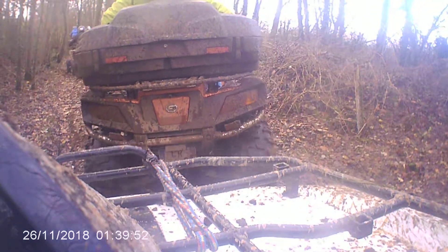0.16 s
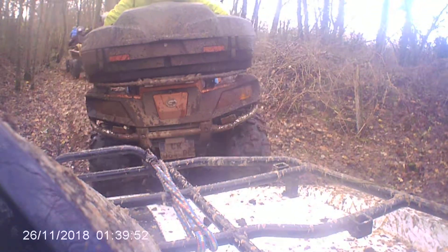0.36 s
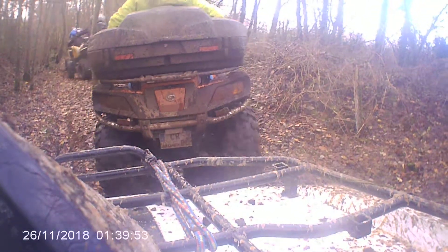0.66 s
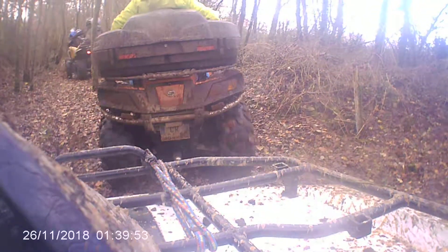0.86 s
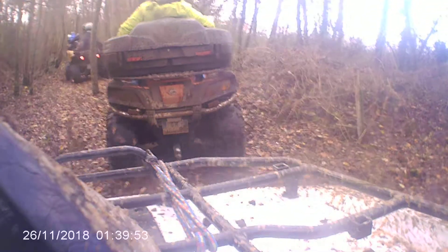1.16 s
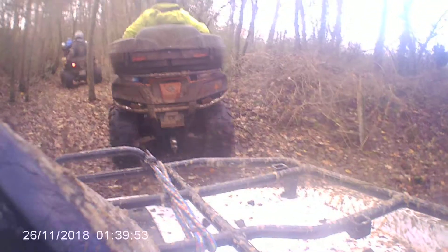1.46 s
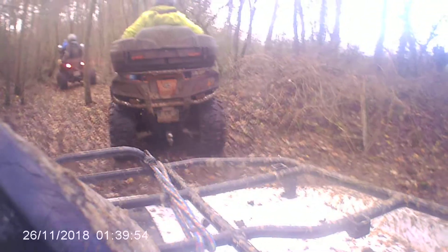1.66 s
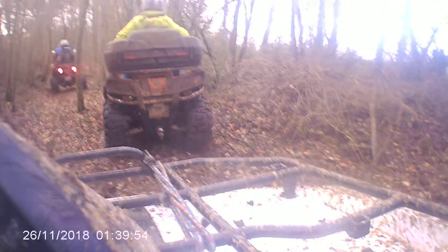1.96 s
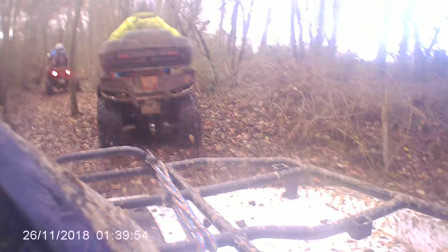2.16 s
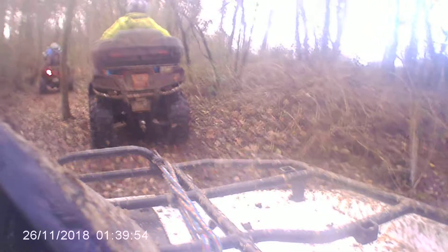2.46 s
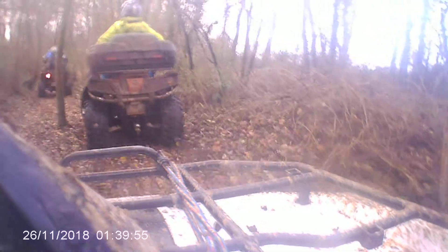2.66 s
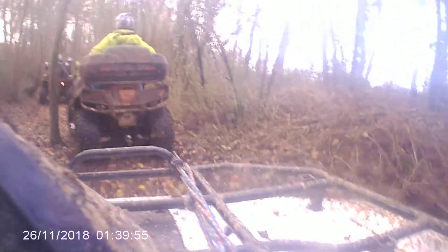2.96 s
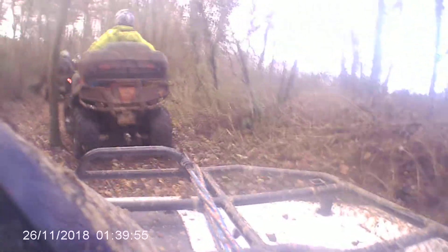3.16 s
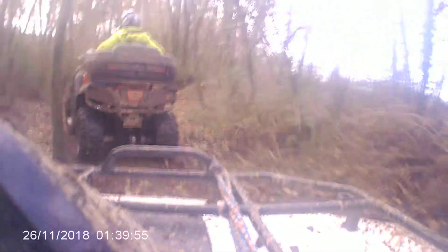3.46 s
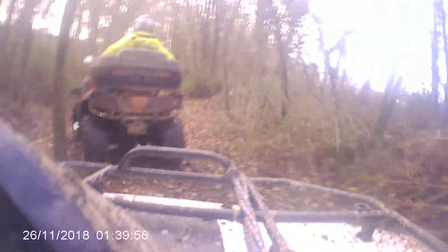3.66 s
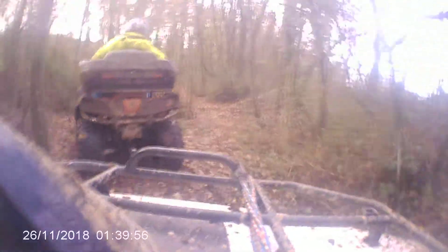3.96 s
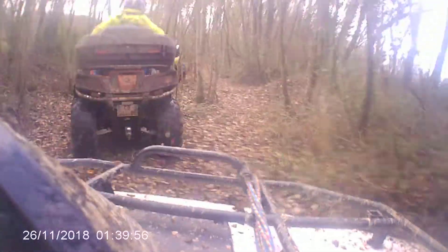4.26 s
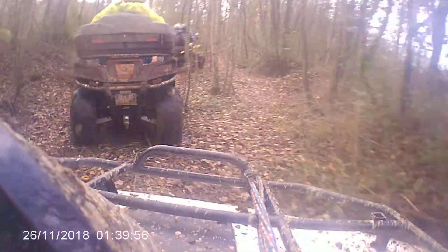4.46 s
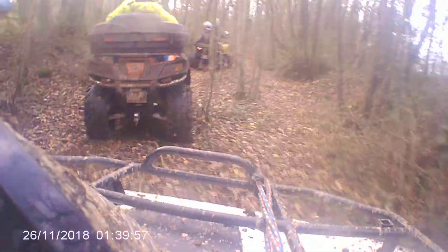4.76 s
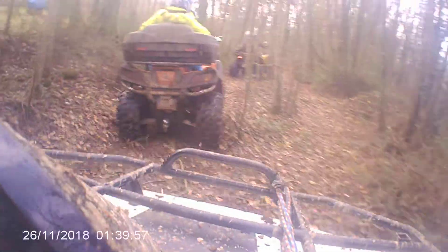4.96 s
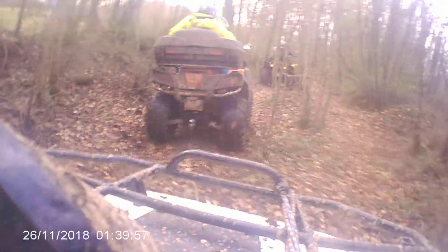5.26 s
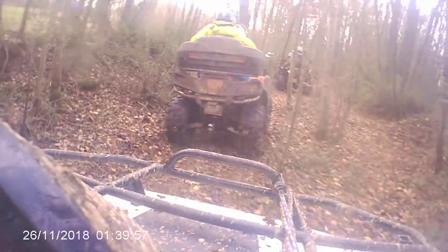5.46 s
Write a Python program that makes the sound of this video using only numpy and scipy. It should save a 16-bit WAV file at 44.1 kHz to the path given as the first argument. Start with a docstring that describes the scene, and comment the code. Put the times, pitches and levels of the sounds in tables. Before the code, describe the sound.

A fast, harsh plastic rattle opens over the low drone of a slow quad bike, shaking the mounted microphone into brief distortion. The rattle drops away, leaving engine throb, tyre rumble and dull ticks of twigs on the trail. It returns with another overload, then gives way to a quieter stretch. A few sharp knocks and one short final rattle follow, while the engine keeps running with small changes in speed.

```python
"""A quad bike crawls along a woodland trail behind another, heard from an action camera mounted on it.
From the start the engine shakes the camera about 40 times a second, over muffled clatter, tyre rumble
and a slower throb; something loose, likely the camera case, knocks twice per crank turn in spells.
Near 1 s the shaking overloads the microphone, then a lull lets dull ticks through. The rattle returns
after 2 s, with more overload near 3 s. After another lull come knocks and a last rattle before 5 s."""
import sys
import numpy as np
from scipy import signal
from scipy.fft import rfft, irfft, next_fast_len
from scipy.io import wavfile
from scipy.ndimage import uniform_filter1d

SR = 44100
rng = np.random.default_rng(int(sys.argv[2]) if len(sys.argv) > 2 else 0)


def transcribe(signal):
    """Save signal, clipped to [-1, 1], as a 16-bit WAV file at the path in sys.argv[1]."""
    frames = np.atleast_2d(signal).T
    limited = np.clip(frames, -1, 1)
    pcm = np.round(limited * 32767).astype(np.int16)
    wavfile.write(sys.argv[1], SR, pcm)


N = 247401
TIME = np.arange(N) / SR


def amp(db):
    """Turn decibels into a gain to multiply by."""
    return 10 ** (np.asarray(db) / 20)


def unit(x):
    """Scale a signal to an average (rms) level of 1."""
    return x / np.sqrt(np.mean(x ** 2) + 1e-20)


def curve(rows):
    """Join (seconds, value) rows with straight lines."""
    return np.interp(TIME, *np.transpose(rows))


def filtered(x, response):
    """Filter a sound; response(hz) says how each frequency is scaled and delayed."""
    size = next_fast_len(len(x) + SR // 2)
    return irfft(rfft(x, size) * response(np.fft.rfftfreq(size, 1 / SR)), size)[:len(x)]


def coloured(x, points):
    """Shape a sound's tone with (Hz, dB) points, then set its level to 1."""
    freqs, db = np.transpose(points)
    return unit(filtered(x, lambda hz: amp(np.interp(np.log(hz + 1), np.log(freqs), db))))


def add(track, s, sound):
    """Mix a short sound into a track, s seconds in."""
    start = int(np.clip(round(s * SR), 0, N - 1))
    track[start:start + len(sound)] += sound[:N - start]


def patchy_noise(patchy_db):
    """White noise with drifting louder and softer patches."""
    spectra = signal.stft(rng.standard_normal(N), nperseg=512)[2]
    patches = uniform_filter1d(rng.standard_normal(spectra.shape), size=4, axis=0)  # smooth over pitch
    patches = uniform_filter1d(patches, size=12, axis=1)  # and over time
    return signal.istft(spectra * amp(patchy_db * unit(patches)), nperseg=512)[1][:N]


# The tone of the tyre rumble. Each row: frequency in Hz, relative level in dB.
RUMBLE_TONE = [(10, -11.5), (20, -6.5), (28, -4), (45, -16), (70, -16), (110, -26.5), (170, -32.5),
               (300, -40), (700, -63), (2000, -120)]

def tyre_rumble(level_db=-29):
    """Tyres and chassis rumble over rough ground."""
    return amp(level_db) * coloured(rng.standard_normal(N), RUMBLE_TONE)


# The clearest ticks. Each row: time in seconds, peak in dB before boost_db is added, pitch in Hz.
CLEAR_TICKS = [(1.5302, -36.5, 1278), (1.7989, -32, 1286), (1.9405, -31.5, 1720), (1.9762, -30.5, 1700),
               (4.9942, -35.5, 1590), (5.3882, -34.5, 1010)]

def twig_ticks(boost_db=3, faint_per_s=4, faint_db=-36, faint_hz=1416, fade_s=0.023, sharpness=4):
    """Small things, likely twigs and stones, tick dully under the wheels; faint ones come at random."""
    clear = [(s, db + boost_db, hz) for s, db, hz in CLEAR_TICKS]
    faint = [(rng.uniform(0, N / SR), faint_db + 2 * rng.normal(), faint_hz * 2 ** (.3 * rng.normal()))
             for _ in range(int(faint_per_s * N / SR))]
    t = np.arange(SR // 16) / SR
    track = np.zeros(N)
    for s, db, hz in clear + faint:
        burst = rng.standard_normal(len(t)) * amp(-60 * t / fade_s)
        # keep the part of the burst near the tick's pitch
        snap = filtered(burst, lambda f: 1 / (1 + 1j * sharpness * (f / hz - hz / (f + 1))) ** 2)
        add(track, s, amp(db) * snap / np.abs(snap).max())
    return track


# The tone of the clatter inside the case. Each row: frequency in Hz, relative level in dB.
CLATTER_TONE = [(120, -6.5), (230, -1.5), (300, 5), (370, -11), (463, 7.5), (550, -16), (690, -2.5),
                (920, -13.5), (1200, -3.5), (1430, -13), (1720, -12), (2000, -25), (2600, -32), (3900, -30),
                (5000, -40.5), (5650, -34.5), (7000, -48), (16000, -57.5)]

def engine_clatter(turns, level_db=-36, db_per_shake_db=0.57, throb_db=3.5):
    """Valve and exhaust noise swells once per crank turn and grows with the shaking."""
    throb = amp(throb_db * np.cos(2 * np.pi * turns))
    gain = amp(level_db + db_per_shake_db * curve(SHAKE_LEVEL))
    return gain * coloured(throb * patchy_noise(patchy_db=3.06), CLATTER_TONE)


# The pitch of the slower throb. Each row: time in seconds, pitch in Hz.
AHEAD_PITCH = [(0, 21.35), (.9, 24.1), (1.3, 30.14), (2.2, 31), (3.4, 27.23), (4.4, 25.33), (5.6, 28.8)]

def quad_ahead(level_db=-23):
    """A low throb, likely the engine of the quad ahead, beats against the shaking."""
    return amp(level_db) * np.sin(2 * np.pi * np.cumsum(curve(AHEAD_PITCH)) / SR)


# The tone of the dull rocking. Each row: frequency in Hz, relative level in dB.
ROCKING_TONE = [(10, 3), (22, 2), (32, -6.5), (65, 5), (100, -4), (140, -13), (220, -19), (400, -40),
                (1500, -100)]

def camera_rocking(level_db=-20.5):
    """The camera rocks on its mount in step with the strength of the rattle."""
    strength = sum(amp(spell_db(spell, TIME)) * (TIME > spell[0]) * (TIME < spell[1])
                   for spell in RATTLE_SPELLS)
    smoothed = np.abs(uniform_filter1d(strength, size=4000))
    swell = np.sqrt(smoothed * strength.max())
    return amp(level_db) * swell * coloured(rng.standard_normal(N), ROCKING_TONE)


def spell_db(spell, at, sag_db=3.5, attack_db=3, attack_s=0.0028):
    """A rattling spell's level: a quick rise, then steady growth or fading, sagging at both ends."""
    start, end, db, growth_db = spell
    since = np.clip(at - start, 0, end - start)
    place = since / (end - start) - .5  # -0.5 at the start, 0.5 at the end
    arch_db = sag_db * (.5 - (2 * place) ** 2)
    return db + growth_db * place + arch_db - attack_db * np.exp(-since / attack_s)


def knock(db, chatter, chatter_s=0.0042, soft_hz=4500):
    """One knock: a hit, a quick rebound and a dying chatter; harder knocks are briefer, so brighter."""
    t = np.arange(SR // 40) / SR
    skitter = rng.standard_normal(len(t)) * np.exp(-t / chatter_s)
    force = chatter * amp(2 * rng.normal()) * skitter / np.linalg.norm(skitter)
    force[0] += 1  # the hit
    force[int(rng.uniform(.0002, .0009) * SR)] -= rng.random()  # the rebound
    cutoff_hz = soft_hz * amp(db)
    pole = np.exp(-2 * np.pi * cutoff_hz / SR)
    softened = signal.lfilter([1 - pole], [1, -pole], force / np.linalg.norm(force))
    return amp(db) * np.hypot(1, 2000 / cutoff_hz) * softened  # hold the level where the case rings most


# The notes the case rings at. Each row: pitch in Hz, width in Hz, relative level in dB.
CASE_NOTES = [(97.7, 150, -14), (432, 210, -8.5), (558, 92, -0.5), (804, 535, -5.5), (1188, 106.5, 2.5),
              (1560, 211, 0), (2203, 310, 1), (2598, 402, -2.5), (3183, 383, -2.5), (4130, 1160, -11.5),
              (4740, 765, -11.5), (5495, 540, -20.5), (7970, 490, -24), (9230, 430, -29.5),
              (13360, 700, -27.5), (13600, 1900, -32)]

def case_ring(force):
    """The plastic case rings briefly at its own notes whenever it is struck."""
    def response(hz):
        return sum((-1) ** k * amp(db) * 1j * hz * width / (pitch ** 2 - hz ** 2 + 1j * hz * width)
                   for k, (pitch, width, db) in enumerate(CASE_NOTES))
    power = np.mean(np.abs(response(np.fft.rfftfreq(SR // 4, 1 / SR))) ** 2)
    return filtered(force, response) / np.sqrt(power)


# Spells of rattling. Each row: start and end in seconds, relative level in dB, growth across it in dB.
RATTLE_SPELLS = [(.014, 0.237, -7, -2), (.303, .40, -8.5, 1.5), (.456, 1.023, -1.47, 3.5),
                 (1.025, 1.067, -6, -5), (1.076, 1.187, -10, -2), (2.116, 2.40, -6, -0.5),
                 (2.5875, 2.65, -8, -2), (2.662, 3.28, -4.5, -3.5), (3.303, 3.40, -9.5, -4),
                 (4.582, 4.857, -15.5, 5.5)]
# Distinct knocks, alone or standing out in a rattle. Each row: time in seconds, relative level in dB.
CASE_KNOCKS = [(0.002, -2.5), (0.237, -11.5), (0.253, 1), (0.292, -9), (0.41, -4), (0.434, -2.5),
               (0.442, -7.5), (1.251, -12.5), (1.263, -9), (1.276, -11), (1.286, -4.5), (1.591, -9.5),
               (1.601, -13.5), (1.63, -18), (1.699, -19), (2.414, -8), (2.422, -3.5), (2.474, -10),
               (2.494, -11.5), (2.506, -11.5), (2.549, -13.5), (2.568, -5), (3.262, -5), (3.718, -22.5),
               (4.363, -21), (4.39, -12.5), (4.398, -12), (4.42, -7.5), (4.431, -11), (4.439, -10),
               (4.447, -5), (4.499, -14.5), (4.643, -4.5), (4.691, -4.5), (4.744, -5), (4.815, -4.5),
               (4.841, -9)]

def case_rattle(turns, boost_db=13, uneven_db=1.65, scatter_db=1.3, jitter_s=.00025):
    """In a spell the case slams one stop and skitters on the other each turn; distinct knocks join in."""
    force = np.zeros(N)
    knock_times = np.transpose(CASE_KNOCKS)[0]
    for spell in RATTLE_SPELLS:
        first_turn, last_turn = np.interp(spell[:2], TIME, turns)
        for swing in range(int(2 * (last_turn - first_turn)) + 1):
            s = np.interp(first_turn + swing / 2, turns, TIME)
            side = 1 if swing % 2 else -1  # 1 slams, -1 skitters
            level_db = spell_db(spell, s)
            late_s = min(jitter_s * amp(-.9 * level_db), .0007) * rng.normal()  # a weak rattle stumbles
            hit_db = level_db + boost_db + uneven_db * side + scatter_db * rng.normal()
            hit = knock(hit_db, chatter=0.42 if side > 0 else 2.3)
            if np.abs(knock_times - s).min() > .006:  # a listed knock replaces the swing beside it
                add(force, s + late_s, hit)
    for s, db in CASE_KNOCKS:
        add(force, s, knock(db + boost_db, chatter=0.66))
    return case_ring(force)


# How hard the engine shakes the microphone. Each row: time in seconds, peak of the main tone in dB.
SHAKE_LEVEL = [(0, -3), (.55, -5), (.7, -12.5), (.8, -5), (.94, -17), (1.03, 1), (1.14, 2.5), (1.42, -16),
               (1.62, -5), (2.1, -20), (2.45, -15.5), (2.66, -0.5), (2.96, 3), (3.24, 0.5), (3.38, -7.5),
               (3.63, -6.5), (3.83, -21.5), (4.32, -13), (4.42, -15), (4.68, -5), (4.95, -13.5),
               (5.33, -18), (5.56, -10)]

def engine_shake(turns, half_db=-32, second_db=-33, third_db=-42):
    """The mount passes mostly one shake per turn; firing every other turn adds a weak lower tone."""
    angle = 2 * np.pi * turns
    tones = [(.5, half_db), (1, 0), (2, second_db), (3, third_db)]
    return amp(curve(SHAKE_LEVEL)) * sum(amp(db) * np.sin(per_turn * angle) for per_turn, db in tones)


# The engine's speed. Each row: time in seconds, crank turns per second.
CRANK_SPEED = [(0.0, 41.37), (0.22, 43.04), (0.36, 46.04), (0.55, 45.42), (0.72, 47.09), (0.9, 46.5),
               (1.04, 40.88), (1.4, 39.52), (1.8, 44.14), (2.15, 47.26), (2.36, 49.72), (2.52, 38.98),
               (2.95, 40.88), (3.27, 39.29), (3.42, 42.44), (3.9, 37.73), (4.5, 37.83), (4.76, 40.83),
               (4.92, 37.66), (5.61, 40.5)]

def scene(hiss_db=-78):
    """One engine speed drives the clatter, the rattle and the shaking; the microphone hisses faintly."""
    turns = np.cumsum(curve(CRANK_SPEED)) / SR
    hiss = amp(hiss_db) * rng.standard_normal(N)
    quad = camera_rocking() + engine_clatter(turns) + case_rattle(turns) + engine_shake(turns)
    background = hiss + tyre_rumble() + twig_ticks() + quad_ahead()
    return (background + quad)[None]


def overload(x, limit=.71, delay_s=.001, tick_s=.00005, tick_db=-8.5, scatter_db=1.5):
    """Loud waves are cut flat at the limit, and tick back from it just after a long overload begins."""
    out = np.clip(x, -limit, limit)
    too_loud = (np.abs(uniform_filter1d(x, size=67)) > limit).astype(int)
    age = np.arange(SR // 1000) / SR / tick_s
    tick = age * np.exp(1 - age)
    for start in np.flatnonzero(np.diff(too_loud) > 0):
        if too_loud[start:start + SR // 240].all():  # lasts about 4 ms or more
            size = amp(tick_db + scatter_db * rng.normal())
            s = start / SR + delay_s * rng.uniform(.85, 1.15)
            add(out, s, -np.sign(x[start]) * size * tick)
    return out


def record(dry, top_hz=15700):
    """The camera overloads, then cuts off the highest treble."""
    return filtered(overload(dry[0]), lambda hz: 1 / np.sqrt(1 + (hz / top_hz) ** 80))[None]


dry = scene()
out = record(dry)
transcribe(out)
```